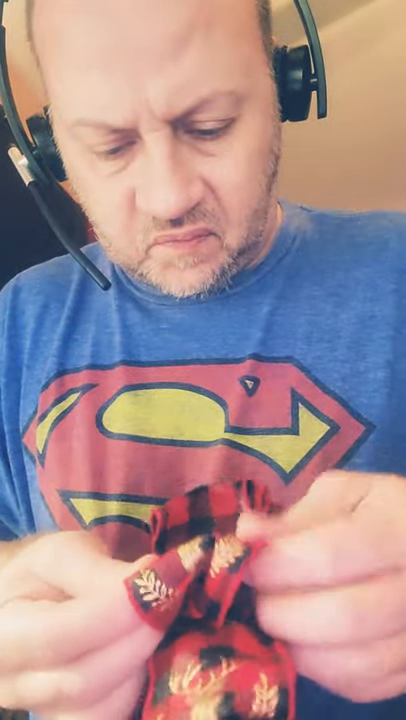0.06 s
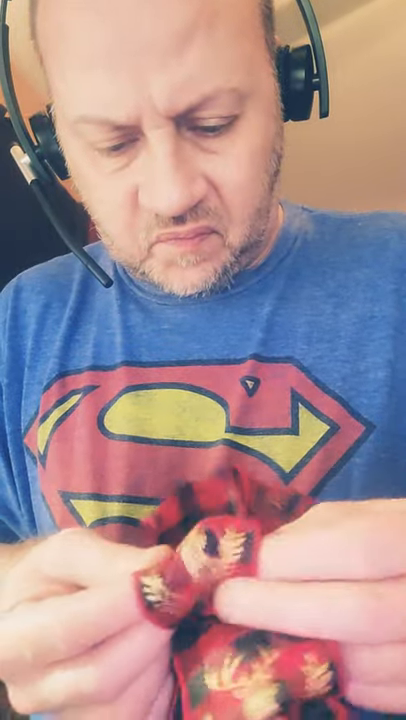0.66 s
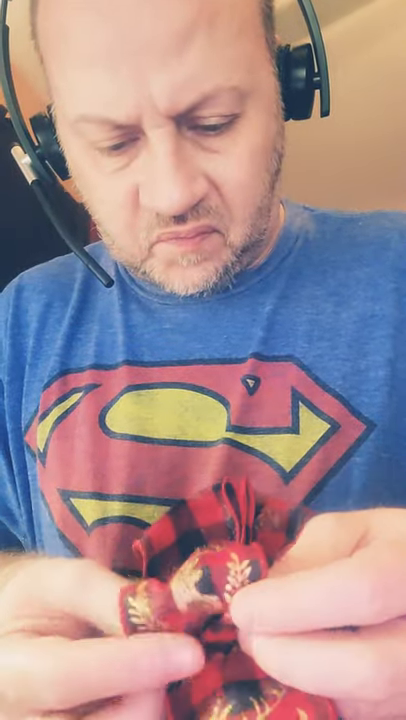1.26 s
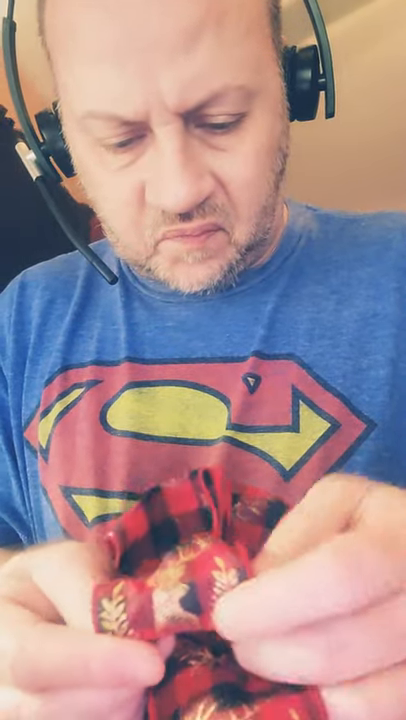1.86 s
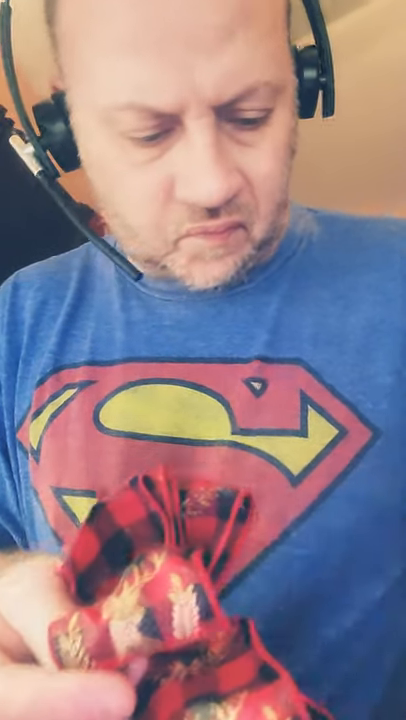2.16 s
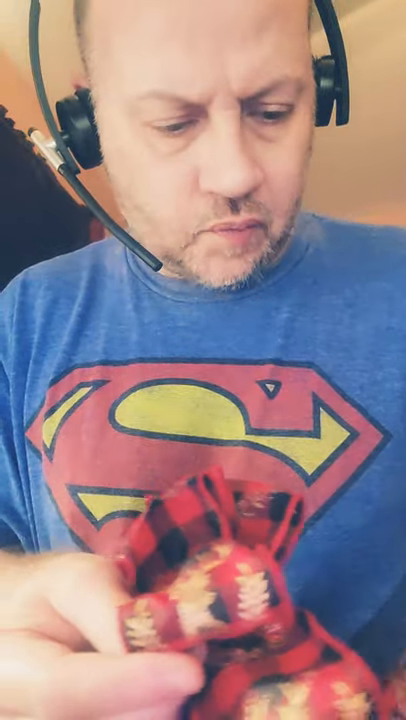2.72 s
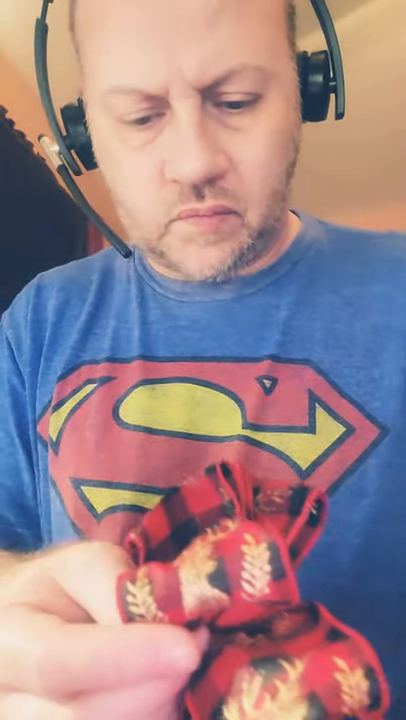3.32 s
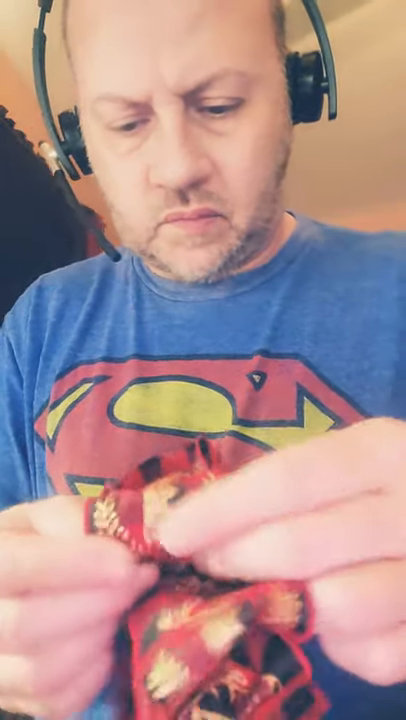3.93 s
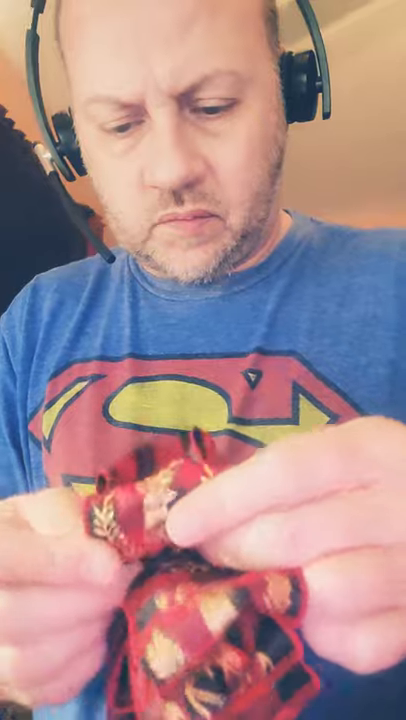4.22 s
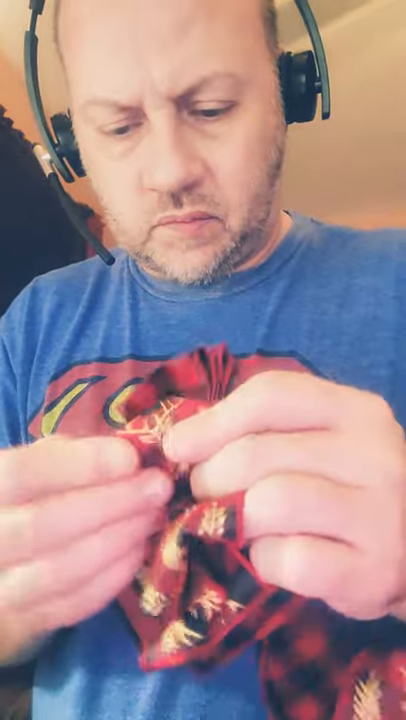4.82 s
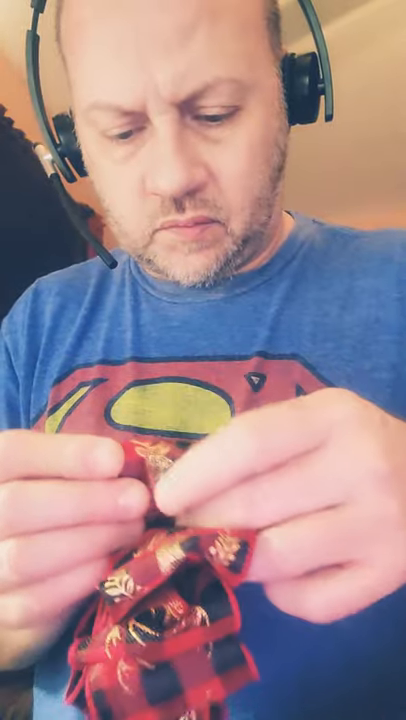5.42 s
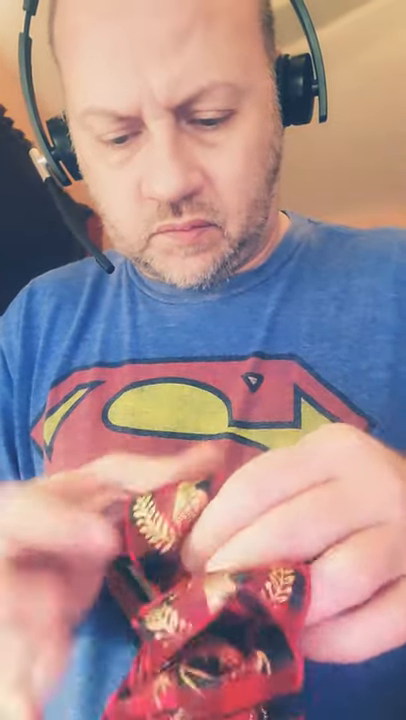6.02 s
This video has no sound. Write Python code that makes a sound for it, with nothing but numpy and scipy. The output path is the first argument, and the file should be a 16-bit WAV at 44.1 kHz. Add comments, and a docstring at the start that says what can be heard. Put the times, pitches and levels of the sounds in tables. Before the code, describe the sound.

Fingers work a wired fabric ribbon close to the microphone, making a soft, fine rustle in uneven strokes throughout, over the low hum of a small room. Dull, light desk knocks come irregularly during the first 1.7 seconds, and a crease snaps sharply at about 1 second. From 2.2 seconds a hand brushes past things and the desk thumps and shudders. Something hard clatters very close on the right, with the loudest blows at 2.5 and 2.7 seconds, then settles in quick bounces. From 2.8 seconds an object rocks from edge to edge on the desk, its hollow ticks growing quicker, slightly higher and fainter until the end at about 6 seconds. Another low desk thump lands near 3.3 seconds. The ribbon keeps rustling, with small crinkles around 3.1, 4.7 and 5.9 seconds.

```python
"""A fine rustle with a few sharp crinkles in a small, humming room: fingers shape a bow of wired fabric
ribbon, its weave hissing and its creases snapping. The desk knocks dully under the arms and shudders.
A hand reaches aside and bumps something that clatters close to the microphone. An object on the desk
is left rocking from edge to edge, its ticks growing quicker and fainter."""
import sys
import numpy as np
from scipy import signal
from scipy.fft import rfft, irfft
from scipy.io import wavfile

SR = 44100
rng = np.random.default_rng(int(sys.argv[2]) if len(sys.argv) > 2 else 0)


def store_pcm(level_fs):
    """Save levels as 16-bit WAV."""
    pcm = np.round(np.clip(level_fs, -1, 1) * 32767).astype(np.int16)
    wavfile.write(sys.argv[1], SR, np.atleast_2d(pcm).T)


N = 268083
TIME_S = np.arange(N) / SR
AGE_S = np.arange(SR // 2) / SR   # time since an impact
ALIKE_BELOW_HZ, CUTOFF_HZ = 380, 15900


def from_db(db):
    """Decibels to gain."""
    return 10 ** (np.asarray(db) / 20)


def level(rows):
    """A (s, dB) curve as a gain per sample."""
    return from_db(np.interp(TIME_S, *np.transpose(rows)))


def decay(t60_s):
    """Envelope that loses 60 dB in t60_s."""
    return np.exp(-np.log(1000) * AGE_S / t60_s)


def add(out, start_s, sound):
    """Mix a sound in at start_s."""
    at = round(start_s * SR)
    out[:, at:at + sound.shape[-1]] += sound[..., :N - at]


def low_pass(x, hz):
    """Second-order roll-off, as a soft contact gives."""
    return signal.sosfilt(signal.butter(2, min(hz, SR / 2 - 1), fs=SR, output="sos"), x)


def coloured(x, spectrum, size=4096):
    """Minimum-phase filter that follows a (Hz, dB) table."""
    hz, db = np.transpose(spectrum)
    gain = from_db(np.interp(np.log(np.fft.rfftfreq(size, 1 / SR) + 1), np.log(hz), db))
    cepstrum = irfft(np.log(gain))[:size // 2]
    cepstrum[0] /= 2
    response = irfft(np.exp(rfft(2 * cepstrum, size)))
    return signal.fftconvolve(np.atleast_2d(x), response[None], axes=1)[:, :x.shape[-1]]


def drift(rate_hz):
    """Random curve through unit-variance knots, rate_hz of them a second."""
    knots = rng.standard_normal(N // 20)
    return np.interp(TIME_S * rate_hz, np.arange(len(knots)), knots)


def stereo_noise():
    """White noise whose long waves reach both microphone ports alike."""
    mid, side = rfft(rng.standard_normal((2, N)))
    alike = 1 / (1 + (np.fft.rfftfreq(N, 1 / SR) / ALIKE_BELOW_HZ) ** 2)
    return irfft(np.sqrt((1 + alike) / 2) * mid + np.sqrt((1 - alike) / 2) * side * [[1], [-1]], N)


def burst(t60_s):
    """Decaying noise at each port."""
    return rng.standard_normal((2, len(AGE_S))) * decay(t60_s)


def ringing(modes, spread_db):
    """Struck modes of uneven strength; the higher ones reach the left port out of phase."""
    hz, db, t60_s = np.transpose(modes)[..., None]
    polarity = (-1) ** np.arange(len(hz))[:, None]
    envelopes = polarity * from_db(db + spread_db * rng.standard_normal(hz.shape)) * decay(t60_s)
    left_rad = rng.standard_normal(hz.shape) * np.minimum(hz / ALIKE_BELOW_HZ, np.pi)
    return np.array([(envelopes * np.sin(2 * np.pi * hz * AGE_S + rad)).sum(0) for rad in (left_rad, 0)])


# Air noise spectrum. Each row: frequency in Hz, gain in dB.
AIR_SPECTRUM = [(20, -37.5), (35, -38.5), (58, -23), (80, -34.5), (110, -30.5), (170, -53), (230, -45),
                (290, -51.5), (400, -48), (750, -58.5), (1100, -63.5), (2000, -67), (4500, -77.5),
                (8000, -85.5), (15000, -81)]
# Hum tones. Each row: frequency in Hz, level in dB.
HUM_TONES = [(59.2, -47), (290.7, -68), (349.9, -82.5), (769.8, -74)]


def room_tone(hum_db, waver_rad):
    """Steady air noise and a slightly wavering hum."""
    hum = sum(from_db(db + hum_db) * np.sin(2 * np.pi * hz * TIME_S + waver_rad * drift(22))
              for hz, db in HUM_TONES)
    return coloured(stereo_noise(), AIR_SPECTRUM) + hum


def friction(snags_per_s, snag_db, flutter_db):
    """Threads catch on each other: a fluttering hiss with tiny separate snags."""
    snags = (rng.random(N) < snags_per_s / SR) * rng.standard_normal((2, N))
    return (stereo_noise() + from_db(snag_db) * snags) * from_db(flutter_db * drift(90))


def shifting_folds(hiss, wander_db, bands):
    """The folds keep changing shape, so each band of the hiss swells and fades on its own."""
    edges_hz = np.linspace(0, CUTOFF_HZ, bands + 1)[1:-1]
    band = np.searchsorted(edges_hz, np.fft.rfftfreq(N, 1 / SR))
    spectrum = rfft(hiss)
    return sum(irfft(spectrum * (band == k), N) * from_db(wander_db * drift(22)) for k in range(bands))


# Ribbon shifting in the hands between strokes. Each row: time in seconds, level in dB.
HANDLING_LEVEL = [(0, -79), (.45, -82.5), (.65, -76), (1.1, -78), (1.8, -76), (2.05, -83), (2.9, -85.5),
                  (3.3, -79), (3.45, -103), (3.8, -76), (4.28, -81), (4.65, -75.5), (5.35, -80.5),
                  (6.08, -72)]
# Finger strokes. Each row: crest time in seconds, length in seconds, level in dB.
FINGER_STROKES = [(0.135, 0.11, -75.5), (0.32, 0.072, -79), (0.586, 0.093, -72.5), (0.717, 0.062, -69),
                  (0.791, 0.071, -68), (0.884, 0.24, -74.5), (1.037, .06, -73.5), (1.204, 0.13, -70.5),
                  (1.374, 0.099, -72), (1.452, 0.036, -67.5), (1.57, 0.054, -76), (1.73, 0.15, -74),
                  (1.997, 0.086, -70), (3.122, 0.16, -74), (3.255, 0.062, -63.5), (3.331, .06, -73),
                  (3.785, 0.26, -72.5), (3.99, 0.093, -70), (4.102, 0.094, -68), (4.188, .09, -80),
                  (4.42, 0.19, -74), (4.723, 0.35, -71.5), (4.89, 0.057, -73), (5.54, .12, -73.5),
                  (5.924, 0.17, -65.5)]
# Hiss of the weave. Each row: frequency in Hz, gain in dB.
RIBBON_SPECTRUM = [(200, -12.5), (1000, 4), (2500, 3.5), (4500, -0.5), (6500, -1), (8000, 2), (11000, 2.5),
                   (15000, 0.5)]


def ribbon_rustle(gain_db, rise_share, stroke_edge_db):
    """The weave hisses as it slides; each stroke gathers speed, crests and stops more quickly."""
    hiss = friction(snags_per_s=220, snag_db=17, flutter_db=1.68)
    weave = shifting_folds(hiss, wander_db=2, bands=10)
    power = level(HANDLING_LEVEL) ** 2
    for crest_s, length_s, db in FINGER_STROKES:
        since_s = TIME_S - crest_s
        from_crest = np.maximum(-since_s / rise_share, since_s / (1 - rise_share)) / length_s
        power += from_db(db + stroke_edge_db * np.minimum(from_crest, 10) ** 1.15) ** 2
    return from_db(gain_db) * np.sqrt(power) * coloured(weave, RIBBON_SPECTRUM)


# Arms on the desk. Each row: start in seconds, level in dB, pitch in Hz.
DESK_KNOCKS = [(.094, -40, 347), (.205, -40, 333), (0.373, -36.5, 353), (0.478, -40, 348),
               (0.704, -42, 335), (1.023, -41.5, 360), (1.1878, -35, 335), (1.378, -49, 343),
               (1.507, -41, 356), (1.679, -45, 340), (2.254, -29.5, 295), (2.378, -25, 297),
               (2.393, -27, 337), (2.776, -34.5, 250), (2.983, -38, 302), (3.083, -38.5, 252.6),
               (3.25, -27, 319)]
# Desk top modes. Each row: nominal frequency in Hz, level in dB, t60 in seconds.
DESK_MODES = [(67.8, -4.5, 0.33), (119, -16.5, 0.17), (343, -1, 0.066), (422.2, -9, 0.13),
              (534, -11.5, 0.073), (756, -18.5, 0.091), (770, -18, 0.026), (980, -32, 0.011),
              (1497, -41, 0.044)]
# Dense ring of a knock, blow or tick. Each row: frequency in Hz, gain in dB.
RATTLE_SPECTRUM = [(100, 0), (300, 14.5), (900, 9.5), (1800, 12), (2200, 4.5), (3200, -0.5), (5000, -1),
                   (15000, -4.5)]


def desk_knocks(gain_db, scuff_db, left_db):
    """Padded knocks ring the desk top; the load on it shifts the pitch."""
    out = np.zeros((2, N))
    strongest_hz = max(DESK_MODES, key=lambda mode: mode[1])[0]
    for start_s, db, hz in DESK_KNOCKS:
        ring = ringing(np.array(DESK_MODES) * [hz / strongest_hz, 1, 1], spread_db=2.2)
        scuff = from_db(scuff_db) * coloured(burst(0.049), RATTLE_SPECTRUM)
        add(out, start_s, from_db(db + gain_db) * low_pass(ring + scuff, 2000))
    bass = low_pass(out[0], 220)   # only the bass reaches the left port in full
    out[0] = from_db(left_db) * out[0] + (1 - from_db(left_db)) * bass
    return out


# Creases snapping, plus two faint high creaks near 3.2 s where something rubs on the desk. Each row: start in
# seconds, level in dB, pitch in Hz, t60 in seconds.
CREASE_SNAPS = [(.9455, -37.5, 9600, 0.0023), (0.9638, -32.5, 9800, 0.012), (0.964, -43, 2220, 0.013),
                (.975, -49, 10000, .03), (0.989, -52, 9000, .042), (2.3383, -45, 13000, 0.013),
                (3.104, -46.5, 3330, .07), (3.215, -52, 13300, 0.059), (3.25, -51, 12460, .04),
                (3.766, -53.5, 4750, 0.089), (4.215, -56.5, 12100, 0.024), (4.674, -38.5, 2900, 0.019),
                (5.053, -52.5, 3970, 0.013), (5.113, -54, 12000, .02), (5.841, -47, 6000, .02),
                (5.928, -47, 5000, 0.043)]


def ribbon_crinkles(gain_db, cloth_db):
    """A crease lets go with a snap that also flicks the cloth around it; the faint high creaks near 3.2 s are
    played the same way."""
    out = np.zeros((2, N))
    for start_s, db, hz, t60_s in CREASE_SNAPS:
        snap = burst(t60_s)
        crease = signal.lfilter(*signal.iirpeak(hz, Q=3.5, fs=SR), snap)
        cloth = from_db(cloth_db) * low_pass(snap, 4500)
        add(out, start_s, from_db(db + gain_db) * (crease + cloth))
    return out


# Brushing hand. Each row: time in seconds, level in dB.
BRUSH_LEVEL = [(2.03, -105), (2.13, -71), (2.33, -68), (2.382, -46.5), (2.42, -56.5), (2.49, -55),
               (2.565, -53.5), (2.645, -47.5), (2.72, -39.5), (2.77, -64), (2.85, -70)]
# Its hiss. Each row: frequency in Hz, gain in dB.
BRUSH_SPECTRUM = [(60, 6.5), (300, 23.5), (1000, 2.5), (3000, -2), (6000, -9), (10000, -18), (15000, -14.5)]


def hand_brush(gain_db):
    """A hand rubs past things on the desk."""
    touching = (TIME_S > BRUSH_LEVEL[0][0]) & (TIME_S < BRUSH_LEVEL[-1][0])
    hiss = friction(snags_per_s=770, snag_db=16, flutter_db=1.5)
    return from_db(gain_db) * level(BRUSH_LEVEL) * touching * coloured(hiss, BRUSH_SPECTRUM)


# Low desk vibrations. Each row: start in seconds, level in dB, pitch in Hz, t60 in seconds.
DESK_SHUDDERS = [(2.254, -32.5, 60, 0.58), (2.321, -15.5, 45.4, 0.2), (2.369, -13.5, 66.9, 0.16),
                 (2.438, -28.5, 51.6, 0.68), (2.52, -25, 74, 0.22), (2.658, -15, 91.3, 0.24),
                 (2.69, -10, 64, 0.19), (2.815, -29.5, 35.8, 0.36), (3.256, -22.5, 60.9, 0.33)]


def desk_shudders(swell_s):
    """Heavier pushes shake the whole desk."""
    out = np.zeros((2, N))
    swell = 1 - np.exp(-AGE_S / swell_s)
    for start_s, db, hz, t60_s in DESK_SHUDDERS:
        add(out, start_s, from_db(db) * swell * decay(t60_s) * np.sin(2 * np.pi * hz * AGE_S))
    return out


# Hard blows. Each row: start in seconds, body level in dB, contact cutoff in Hz, crack level in dB.
CLATTER_BLOWS = [(2.2555, -34.5, 1570, -62), (2.266, -32, 1200, -43.5), (2.3735, -30.5, 2800, -60),
                 (2.38, -41, 2000, -42), (2.396, -33, 2000, -56.5), (2.501, -11, 4000, -27),
                 (2.5114, -23.5, 1500, -16.5), (2.521, -12.5, 1600, -23), (2.5742, -29, 3000, -32.5),
                 (2.651, -3.5, 1488, -27.5), (2.6592, -12.5, 2150, -10), (2.671, -26, 2000, -24),
                 (2.6835, -5, 2370, -18)]
# Modes of a blow. Each row: frequency in Hz, level in dB, t60 in seconds.
CLATTER_MODES = [(127, -12, 0.038), (152.7, -22.5, 0.15), (215.6, -15, 0.22), (250, -13, 0.2),
                 (285.6, -8, 0.13), (337, -15.5, 0.13), (477.5, -11.5, 0.1), (519.6, -10.5, 0.12),
                 (718, -13.5, 0.12), (786, -13, 0.098), (992, -18, 0.11), (1166, -13, 0.061),
                 (1433, -22, 0.11), (1748, -14, 0.061), (1850, -13.5, 0.074), (2466, -21, 0.11)]
# Crack of a blow. Each row: frequency in Hz, gain in dB.
CRACK_SPECTRUM = [(2000, -3), (4500, -1), (6900, -3), (8000, 4), (8600, 5.5), (9400, -2.5), (12200, -5),
                  (13400, 7.5), (14200, -5), (15200, 2.5)]


def clatter(ring_db, rattle_db, crack_gain_db):
    """A hard thing bounces and settles: each blow is a crack and a short, dense ring."""
    out = np.zeros((2, N))
    settling = bounces(start_s=CLATTER_BLOWS[-1][0] + 0.0135, count=6)
    for start_s, body_db, contact_hz, crack_db in [*CLATTER_BLOWS, *settling]:
        chatter = from_db(0.9 * drift(980)[:len(AGE_S)])   # surfaces touch repeatedly within a blow
        ring = from_db(ring_db) * ringing(CLATTER_MODES, spread_db=2)
        rattle = from_db(rattle_db) * coloured(chatter * burst(0.062), RATTLE_SPECTRUM)
        body = from_db(body_db) * low_pass(ring + rattle, contact_hz)
        crack = coloured(burst(0.019) + from_db(-19.5) * chatter * burst(0.11), CRACK_SPECTRUM)
        add(out, start_s, body + from_db(crack_db + crack_gain_db) * crack)
    return out


def bounces(start_s, count, gap_s=0.0095, gap_ratio=0.92, body_loss_db=0.76, crack_loss_db=7.5):
    """Settling bounces, each sooner and weaker, as rows like those of CLATTER_BLOWS."""
    for k in range(count):
        yield start_s, -16 - k * body_loss_db, 2000, -28 - k * crack_loss_db
        start_s += gap_s * gap_ratio ** k


# Path to the far, left port. Each row: frequency in Hz, gain in dB.
SHADOW_SPECTRUM = [(130, 0), (180, 1), (300, -9), (600, -12), (2000, -6), (5000, -3.5), (8000, 0),
                   (15000, -4.5)]


def beside_right_port(x):
    """A sound close to the right port reaches the left one shadowed."""
    return np.vstack([coloured(x[0], SHADOW_SPECTRUM), x[1]])


# Rocking pace. Each row: time in seconds, full swing in seconds, near-to-far-edge delay in seconds.
SWING_PACE = [(2.8, 0.2255, 0.0784), (3.05, 0.2018, 0.0699), (3.4, 0.1639, 0.0675), (4.05, 0.1279, 0.0666),
              (4.35, 0.1171, 0.0649), (4.72, 0.1235, 0.0781), (5.3, 0.0982, 0.0623), (6.0, 0.0722, 0.0433)]
# Force of the falls. Each row: time in seconds, near edge level in dB, far edge level in dB.
FALL_LEVELS = [(2.8, -40, -41), (3.4, -43, -46.5), (4.05, -43, -44), (4.4, -47, -49.5), (4.75, -48.5, -50),
               (5.3, -51, -51.5), (6.0, -54.5, -58.5)]


def touchdowns(start_s, end_s, uneven_db):
    """Each swing lands on the near edge, then the far one; returns (s, dB) rows."""
    pace_s, swing_s, across_s = np.transpose(SWING_PACE)
    fall_s, near_db, far_db = np.transpose(FALL_LEVELS)
    at_s, ticks = start_s, []
    while at_s < end_s:
        ticks.append((at_s, np.interp(at_s, fall_s, near_db)))
        ticks.append((at_s + np.interp(at_s, pace_s, across_s), np.interp(at_s, fall_s, far_db)))
        at_s += np.interp(at_s, pace_s, swing_s)
    return [(at_s, db + uneven_db * rng.standard_normal()) for at_s, db in ticks if at_s < end_s]


# Clack of the edge, rising as the swings shrink. Each row: time in seconds, pitch in Hz.
CLACK_PITCH = [(2.8, 747), (4.25, 767), (4.7, 1052), (5.5, 1097)]
# Modes of a tick. Each row: frequency in Hz, level in dB, t60 in seconds.
ROCKING_MODES = [(518.6, -5, 0.051), (723, -11, 0.049), (996, -12.5, 0.049), (1186, -12, 0.036),
                 (1476, -10.5, 0.021), (1730, -11, 0.021), (1894, -8, 0.022), (2310, -17, 0.036),
                 (2434, -21.5, 0.034), (2740, -15, 0.021)]


def rocking(gain_db, clack_db, rattle_db, contact_hz, hardening, swell_s, left_db):
    """The object falls on its two edges in turn; the weaker the fall, the softer the contact."""
    out = np.zeros((2, N))
    loudest_db = np.max(np.array(FALL_LEVELS)[:, 1:])
    swell = 1 - np.exp(-AGE_S / swell_s)   # the ring spreads through the desk
    for k, (start_s, db) in enumerate(touchdowns(start_s=2.813, end_s=6.02, uneven_db=0.54)):
        clack_mode = (np.interp(start_s, *np.transpose(CLACK_PITCH)), clack_db, 0.035)
        ring = ringing([*ROCKING_MODES, clack_mode], spread_db=2.1)
        rattle = from_db(rattle_db) * coloured(burst(0.08), RATTLE_SPECTRUM)
        edge_hz = contact_hz * from_db(hardening * (db - loudest_db) - 4.5 * (k % 2))   # far edge duller
        tick = low_pass(swell * (ring + rattle), edge_hz)
        add(out, start_s, from_db(db + gain_db) * low_pass(tick, 3500))
    return out * from_db([[left_db], [0]])


def room_reverb(x, t60_s, wet_db):
    """Furnished walls add a faint, dull tail."""
    tail = low_pass(burst(t60_s), 2200) * (1 - np.exp(-AGE_S / 0.0049))
    tail /= np.sqrt((tail ** 2).sum(1, keepdims=True))
    return x + from_db(wet_db) * signal.fftconvolve(x[1:], tail, axes=1)[:, :N]


def scene():
    """Ribbon, desk, clatter and rocking object in the humming room."""
    sources = ribbon_rustle(gain_db=2, rise_share=0.62, stroke_edge_db=-12.5)
    sources += ribbon_crinkles(gain_db=0.5, cloth_db=-14)
    sources += desk_knocks(gain_db=2.5, scuff_db=-26, left_db=-16.5)
    sources += desk_shudders(swell_s=0.02)
    sources += beside_right_port(hand_brush(gain_db=6))
    sources += beside_right_port(clatter(ring_db=-5, rattle_db=-11.5, crack_gain_db=-5.5))
    sources += rocking(gain_db=4, clack_db=-5, rattle_db=-16, contact_hz=3210, hardening=0.52,
                       swell_s=0.0017, left_db=-8)
    return room_reverb(sources, t60_s=0.21, wet_db=-23.5) + room_tone(hum_db=-1.5, waver_rad=0.95)


# Microphone port responses. Each row: frequency in Hz, gain in dB.
LEFT_RESPONSE = [(60, 1), (200, 2), (400, -1.5), (1000, -4), (2400, -4.5), (4400, -10), (6500, -14.5),
                 (8100, -21), (9700, -7), (12000, -7.5), (15000, -5)]
RIGHT_RESPONSE = [(60, 2.5), (6800, 1.5), (7700, 8), (8600, 12), (9600, 8.5), (11500, 4), (13300, 5.5),
                  (14300, -4), (16000, -3.5)]


def record(dry):
    """Each port adds its own treble resonances; the top is cut."""
    ports = np.vstack([coloured(dry[0], LEFT_RESPONSE), coloured(dry[1], RIGHT_RESPONSE)])
    return signal.sosfilt(signal.ellip(10, 0.2, 80, CUTOFF_HZ, fs=SR, output="sos"), ports)


dry = scene()
out = record(dry)
store_pcm(out)
```